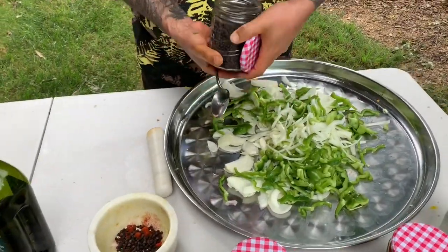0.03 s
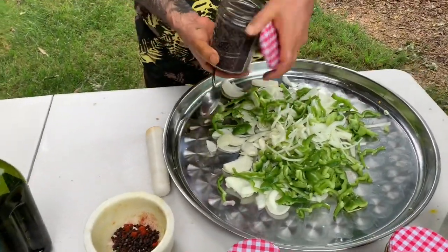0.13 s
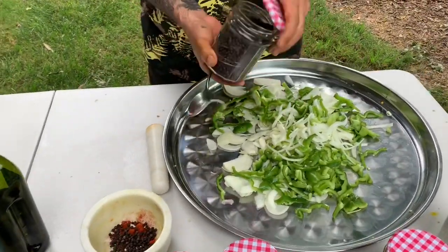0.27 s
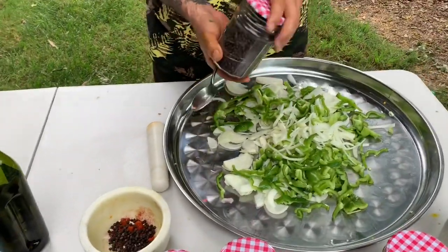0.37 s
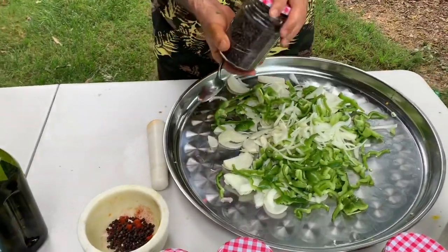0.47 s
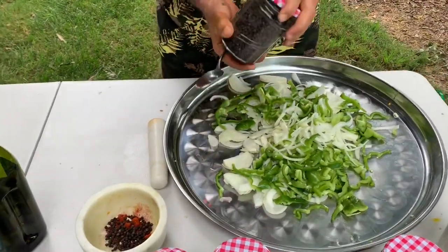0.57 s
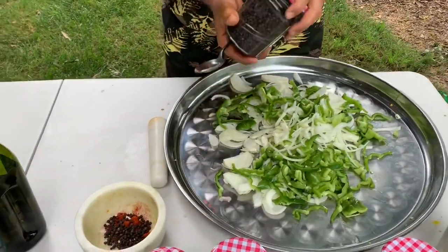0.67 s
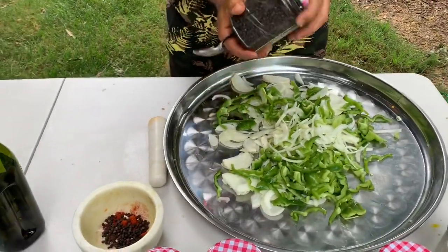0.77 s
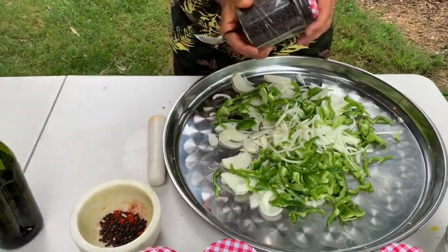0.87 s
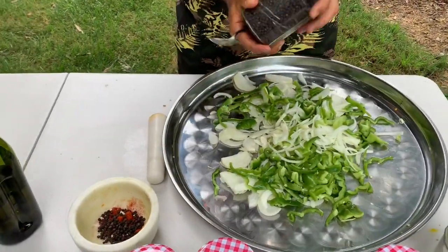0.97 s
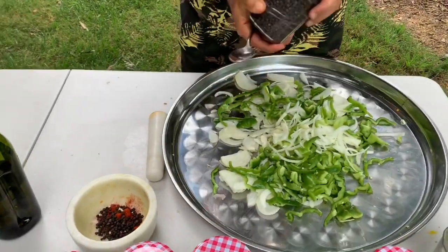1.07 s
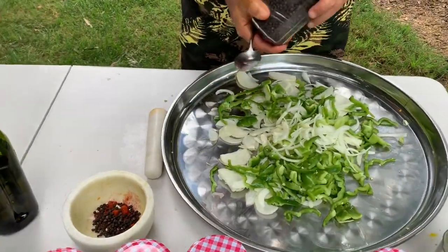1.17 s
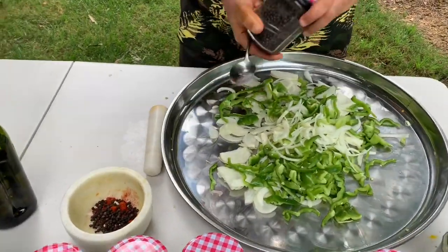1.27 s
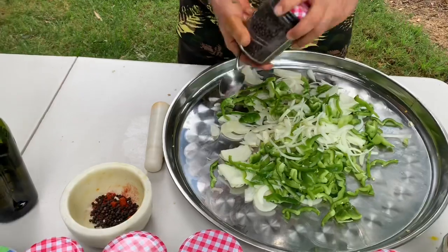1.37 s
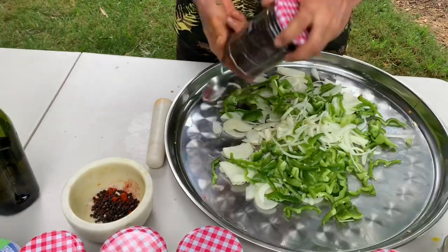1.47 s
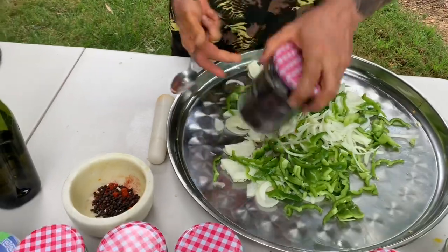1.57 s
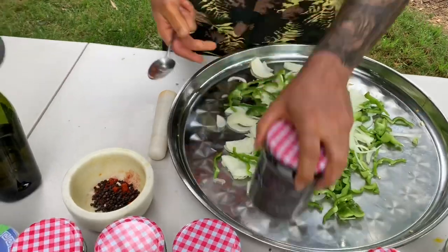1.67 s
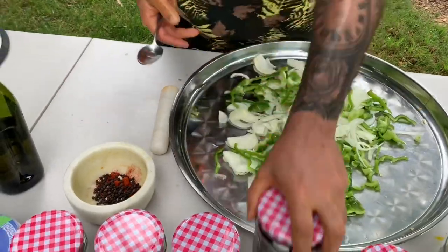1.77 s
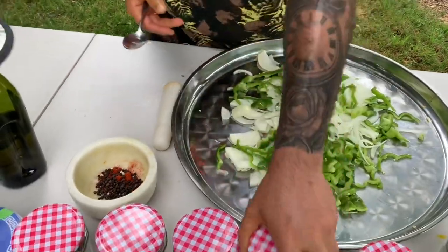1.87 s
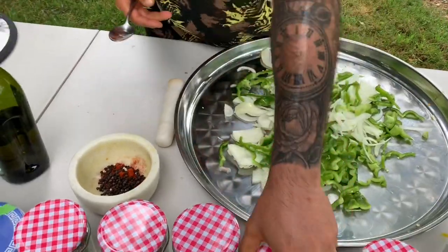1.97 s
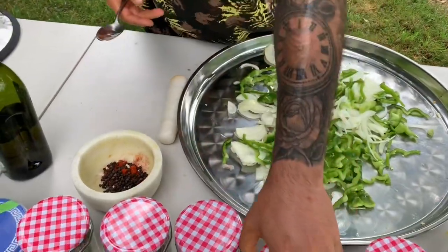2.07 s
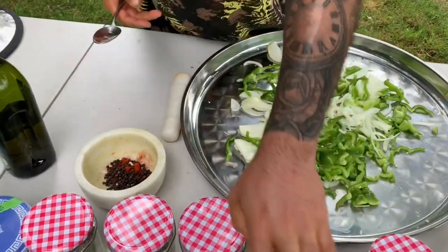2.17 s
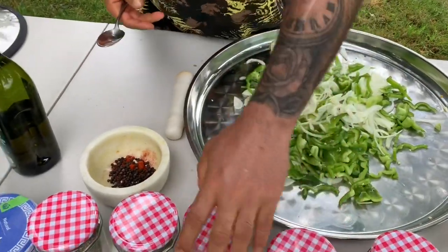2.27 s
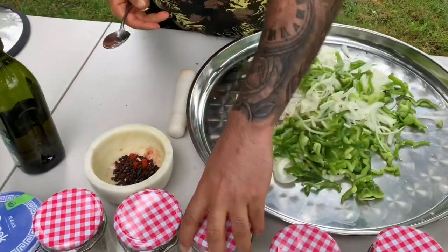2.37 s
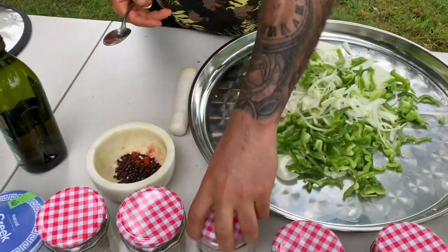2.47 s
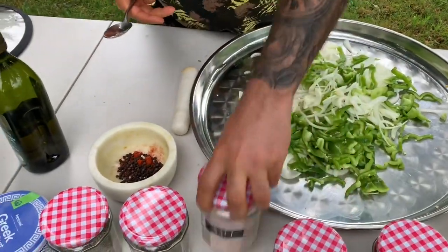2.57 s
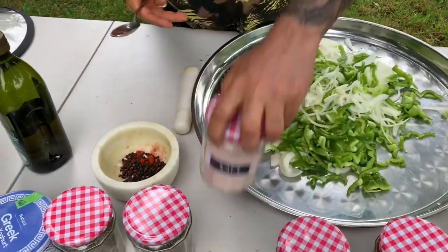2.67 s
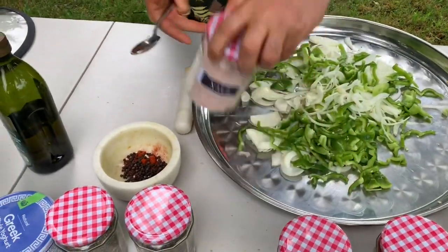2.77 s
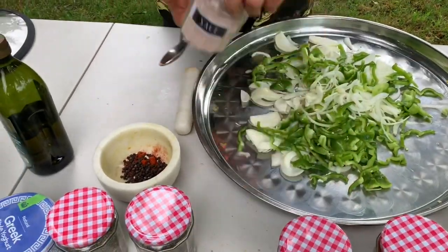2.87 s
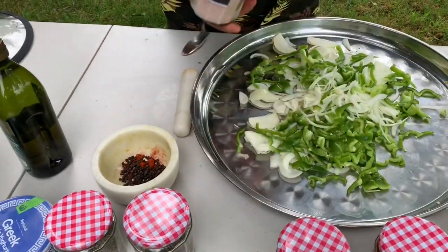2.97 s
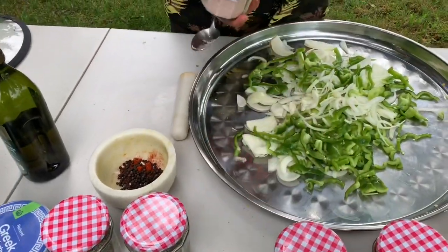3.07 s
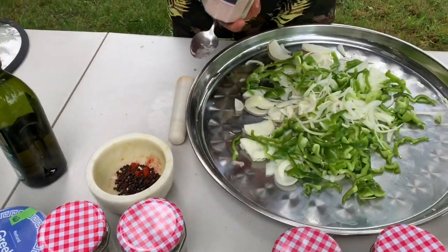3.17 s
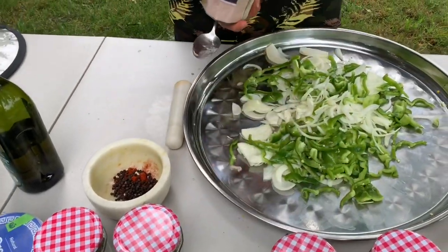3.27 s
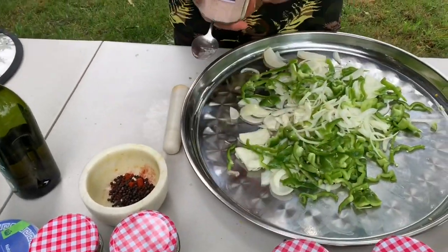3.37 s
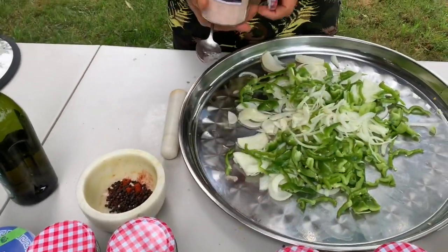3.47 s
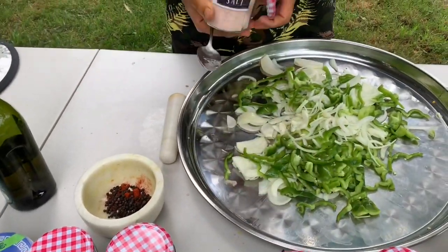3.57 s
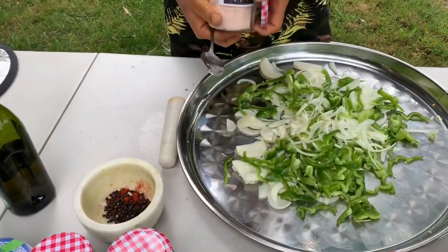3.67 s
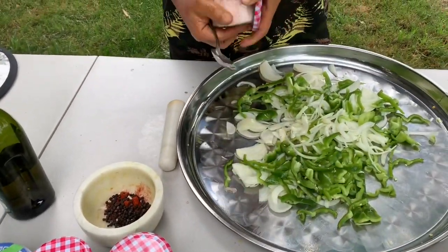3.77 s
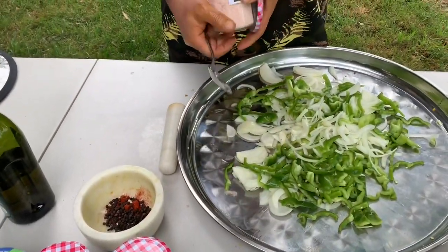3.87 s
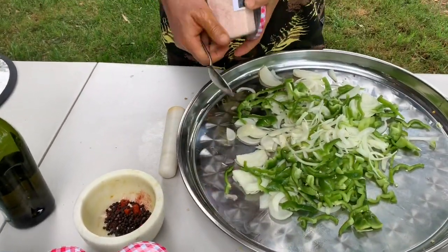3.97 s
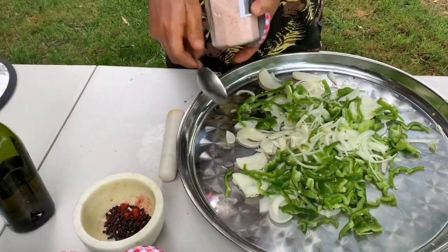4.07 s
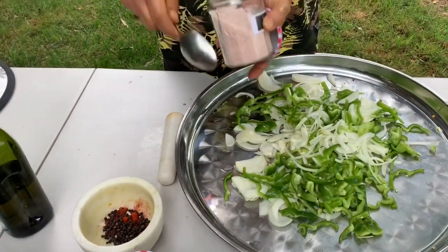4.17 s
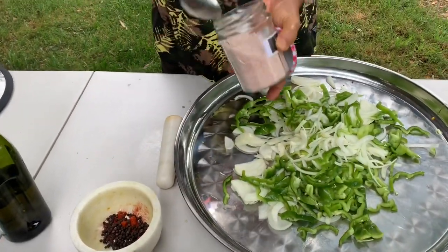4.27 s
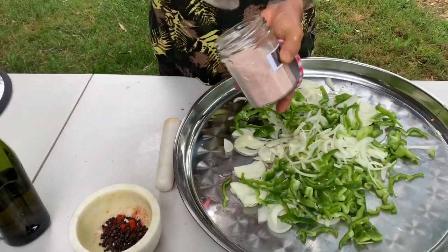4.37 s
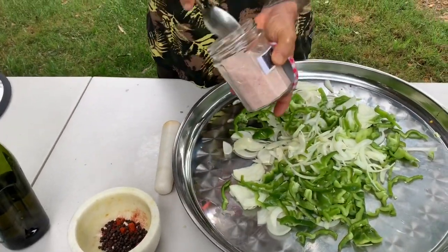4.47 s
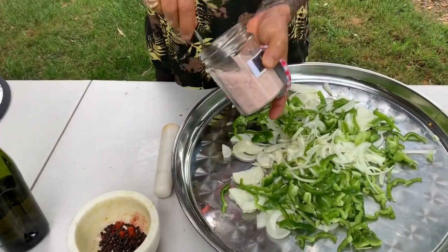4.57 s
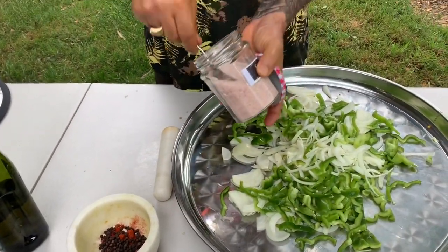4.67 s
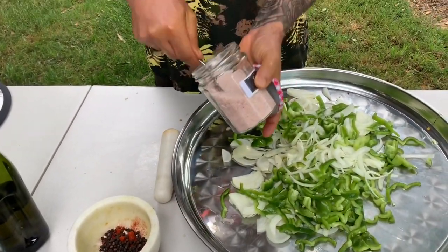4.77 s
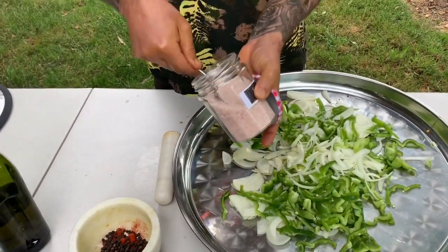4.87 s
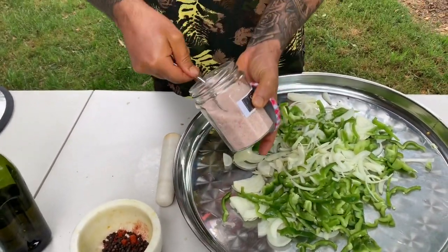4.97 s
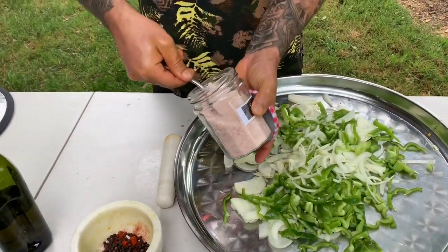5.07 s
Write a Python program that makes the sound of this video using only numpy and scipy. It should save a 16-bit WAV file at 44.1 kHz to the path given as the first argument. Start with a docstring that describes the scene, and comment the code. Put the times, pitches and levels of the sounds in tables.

```python
"""In a garden, spices are added to a steel tray of vegetables on a folding table, near the microphones.
A spoon and a tin lid clink on a pepper jar; the jar is set down hard, so that table, tray and
peppercorns rattle. The spoon clicks on a salt jar's lid, clatters on the tray's rim and taps the glass.
Each impact excites the damped modes of the body struck; friction drives such modes with noise.
A small bird calls over a distant hum."""
import sys
import numpy as np
from scipy import signal
from scipy.fft import rfft, irfft, next_fast_len
from scipy.io import wavfile
from scipy.ndimage import uniform_filter1d, map_coordinates

SR = 44100
rng = np.random.default_rng(int(sys.argv[2]) if len(sys.argv) > 2 else 0)


def dump(signal):
    """Clip the signal to [-1, 1] and save it as 16-bit WAV at the path in sys.argv[1]."""
    limited = np.clip(np.atleast_2d(signal).T, -1, 1)
    pcm = np.round(limited * 32767).astype(np.int16)
    wavfile.write(sys.argv[1], SR, pcm)


N = 225218
TIME = np.arange(N) / SR
AGE = TIME[:SR // 2]  # time since an impact, in s
TOP_HZ = 16400


def amp(db):
    """Amplitude ratio of a level in decibels."""
    return 10 ** (np.asarray(db) / 20)

def unit(x):
    """Normalisation to rms 1."""
    return x / np.sqrt(np.mean(x ** 2) + 1e-20)

def crest(x, size=176):
    """Normalisation of the loudest few milliseconds to rms 1."""
    power = np.abs(uniform_filter1d(x ** 2, size, mode="constant")).mean(0)
    return x / np.sqrt(power.max() + 1e-20)

def along(points, hz):
    """Interpolation of (f/Hz, value) points on a logarithmic frequency axis."""
    f, v = np.transpose(points)
    return np.interp(np.log(hz + 1), np.log(f + 1), v)

def wobble(rate):
    """Smooth random modulation with rate knots a second."""
    return map_coordinates(rng.standard_normal(int(N * rate / SR) + 4), [TIME * rate])

def filtered(x, response):
    """Linear filtering: the spectrum times a frequency response."""
    n = x.shape[-1]
    m = next_fast_len(n + 4096)
    return irfft(rfft(x, m) * response(np.fft.rfftfreq(m, 1 / SR)), m)[..., :n]

def coloured(x, spectrum):
    """Spectral shaping by (f/Hz, level/dB) points, at rms 1."""
    return unit(filtered(x, lambda hz: amp(along(spectrum, hz))))

def pair(n, width):
    """Partly coherent noise at two microphones."""
    mid, side = rng.standard_normal((2, n))
    return np.array([mid + width * side, mid - width * side])

def add(track, s, sound):
    """Superposition of a sound on the track at time s."""
    part = track[:, round(s * SR):][:, :sound.shape[-1]]
    part += sound[..., :part.shape[-1]]

def strokes(rows, attack_s, fade_db_per_s):
    """Envelopes summed in power: each (t/s, duration/s, level/dB) swells up to t, holds, then fades."""
    power = np.zeros(N)
    for s, length, db in rows:
        swell = np.exp(np.minimum(TIME - s, 0) / attack_s)
        power += (swell * amp(db - fade_db_per_s * np.maximum(TIME - s - length, 0))) ** 2
    return np.sqrt(power)

def ring(modes, detune=0, line_width=.0021):
    """Free vibration as a sum of damped modes, varying with the spot struck and the grip."""
    hz, db, t60 = np.transpose(modes)
    strength, pitch, side = rng.standard_normal((3, len(hz)))
    # the shifting grip walks each phase, broadening the line by a fraction line_width of its frequency
    step = np.sqrt(2 * np.pi * line_width * hz / SR)[:, None]
    drift = np.cumsum(rng.standard_normal((len(hz), len(AGE))), axis=1) * step
    phase = 2 * np.pi * np.outer(hz * (1 + detune * pitch), AGE) + drift
    gains = (-1) ** np.arange(len(hz)) * amp(db + strength + np.outer([.5, -.5], side))
    return gains @ (np.sin(phase) * amp(-60 * AGE / t60[:, None]))

def rubbed(modes):
    """Forced vibration: friction noise drives a body's modes, at rms 1."""
    slips = pair(N, 0.18) * amp(2.5 * wobble(200))
    return unit(signal.fftconvolve(slips, ring(modes), axes=1)[:, :N])

def knocks(rows, attack_s=0.0038):
    """A single damped resonance gives one short, dull note for each row."""
    out = np.zeros((2, N))
    for s, db, hz, t60 in rows:
        note = np.sin(2 * np.pi * hz * AGE) * amp(-60 * AGE / t60) * (1 - np.exp(-AGE / attack_s))
        add(out, s, amp(db) * note / np.abs(note).max())
    return out


# spectrum of the open air: f/Hz, level/dB
AIR_SPECTRUM = [(20, -45), (45, -14), (65, -6.5), (165, -20), (237, -17.5), (361, -25.5), (428, -17.5),
                (599, -27), (816, -28), (1900, -38), (2660, -42.5), (3140, -47), (13200, -49),
                (16500, -69.5)]
# its likeness at the two microphones: f/Hz, coherence
AIR_COHERENCE = [(60, 0.81), (240, 0.93), (950, 0.15), (3770, 0.034), (15000, 0.01)]
# tones of distant machinery: f/Hz, level/dB
HUM_TONES = [(61, -60.5), (441, -86)]

def garden():
    """A diffuse field, coherent only in the bass: open-air rumble, with a wavering far hum."""
    def mid_side_gains(hz):
        angle = np.arccos(np.clip(along(AIR_COHERENCE, hz), -1, 1)) / 2
        return np.array([np.cos(angle), np.sin(angle)])
    mid, side = filtered(rng.standard_normal((2, N)), mid_side_gains)
    air = amp(-60.5 + 0.52 * wobble(7.9)) * coloured(np.array([mid + side, mid - side]), AIR_SPECTRUM)
    hum = sum(amp(db + wobble(2.6)) * np.sin(2 * np.pi * hz * TIME + 0.8 * wobble(2.5))
              for hz, db in HUM_TONES)
    return air + hum


# a faint far whine: t/s, duration/s, level/dB, f/Hz
WHINES = [(2.536, .8, -71.5, 813)]

def far_whine():
    """Phase modulation makes a thin, distant tone waver as it comes and goes."""
    return sum(strokes([row], 0.048, 110) * np.sin(2 * np.pi * hz * TIME + .5 * wobble(15))
               for *row, hz in WHINES)


# a bird's thin, buzzy notes: t/s, duration/s, level/dB
BIRD_NOTES = [(2.099, 0.085, -58), (2.194, 0.077, -57), (2.745, 0.093, -58), (2.845, 0.06, -54.5),
              (3.02, 0.038, -55), (3.1, 0.025, -53), (3.165, 0.12, -59)]

def bird(pitch_hz=7550, shake_hz=400, shake_rate=900, fall_hz=400):
    """Rapid frequency modulation roughens falling notes; scattering by foliage blurs them."""
    song = np.zeros((1, N))
    for s, length, db in BIRD_NOTES:
        t = AGE[:int(length * SR)]
        shake = map_coordinates(rng.standard_normal(len(t)), [t * shake_rate])
        hz = pitch_hz + fall_hz * (.5 - t / length) + shake_hz * shake
        add(song, s, amp(db) * np.sin(np.pi * t / length) ** 2 * np.sin(2 * np.pi * np.cumsum(hz) / SR))
    leaves = rng.standard_normal((2, len(AGE))) * amp(-60 * AGE / 0.2)
    return signal.fftconvolve(song, leaves / np.linalg.norm(leaves[0]), axes=1)[:, :N]


# reverberation time of the garden: f/Hz, T60/s
GARDEN_DECAY = [(100, 0.24), (1000, 0.93), (2500, 0.54), (8000, 0.24), (15000, 0.28)]

def reflections(x, echo_s=0.16, smear_s=0.044, echo_db=3):
    """Reverberation: trees and fences return a decaying tail with one smeared echo."""
    hz, t, noise = signal.stft(rng.standard_normal((2, SR)), SR, nperseg=256)
    fence_db = echo_db * np.exp(-.5 * ((t - echo_s) / smear_s) ** 2)
    decay_db = 60 * t / along(GARDEN_DECAY, hz)[:, None]
    tail = signal.istft(noise * amp(fence_db - decay_db), SR, nperseg=256)[1]
    return signal.fftconvolve(x, tail / np.linalg.norm(tail[0]), axes=1)[:, :N]


def hops(landing_s=1.952, flight_s=.063, restitution=0.78, first_db=-34, loss_db=9.5, scatter=0.24):
    """Inelastic bouncing: peppercorns thrown up by the jar's landing hop ever shorter and weaker."""
    hop = np.arange(3)
    flights = flight_s * restitution ** hop
    return list(zip(landing_s + np.cumsum(flights), first_db - loss_db * hop, scatter * flights))

# spice slides in a tilted jar: t/s, duration/s, level/dB
SLIDES = [(0.46, 0.014, -57.5), (0.79, 0.32, -63), (1.7, 0.18, -64), (4.52, .15, -68)]
# a few peppercorns tumble against the glass: t/s, level/dB, spread/s
CORN_TUMBLES = [(1.1, -53, 0.0015), (0.89, -54, 0.00095), (0.98, -43.5, 0.00085), (1.1, -45, 0.00073),
                (1.108, -60, 0.0015), (1.534, -58, 0.0017), (1.711, -59.5, 0.0016), (1.566, -61, 0.01324)]
# spectrum of grains on glass: f/Hz, level/dB
GRAIN_SPECTRUM = [(600, -25), (1200, -5), (2600, -0.5), (5500, -4), (8300, -0.5), (10500, -1.5),
                  (11800, -15), (13300, -2.5), (14700, -11.5), (16500, -21.5)]

def spice(grains_per_s=8000, grain_t60=.003, scatter_db=2, spurt_db=1.6):
    """Shot noise: countless dry grains strike glass, each at its own pitch, as they slide and hop."""
    flow = strokes(SLIDES, attack_s=.02, fade_db_per_s=170.5) * amp(spurt_db * wobble(70))
    for s, db, spread in CORN_TUMBLES + hops():
        flow += amp(db) * np.exp(-.5 * ((TIME - s) / spread) ** 2)
    when, pitch, strength, side = rng.random((grains_per_s * N // SR, 4)).T[..., None]
    t = AGE[:128]
    fading = amp(-scatter_db * np.log(1 - strength) - 60 * t / grain_t60)
    phase = 2 * np.pi * TOP_HZ * pitch * t
    index = ((when * N).astype(int) + np.arange(len(t))).ravel()
    grains = [np.bincount(index, (fading * np.sin(phase + ear * (side - .5))).ravel(), N)[:N]
              for ear in (1, -1)]
    return flow * coloured(np.array(grains), GRAIN_SPECTRUM)


def favoured(modes, spot_hz=None, boost_db=13, octaves=0.13):
    """The point of excitation weights the modes: those near spot_hz ring more strongly."""
    if spot_hz is None:
        return modes
    return [(hz, db + boost_db * np.exp(-.5 * (np.log2(hz / spot_hz) / octaves) ** 2), t60)
            for hz, db, t60 in modes]

# spectrum of the crowd of short-lived modes in every contact: f/Hz, level/dB
CRACK_SPECTRUM = [(150, -25), (400, 2), (900, -4), (2400, 0.5), (4200, -10), (6500, -14.5), (10300, -10),
                  (11800, -17.5), (13500, -10), (16500, -25)]

def clinks(taps, modes, crack_db, crack_t60, lowest_hz, detune):
    """Impact excitation: modes ring over a brief crack; a tap's treble is set relative to its body."""
    out = np.zeros((2, N))
    lowpass, highpass = (signal.butter(4, 5000, kind, fs=SR, output="sos") for kind in ("low", "high"))
    for s, db, treble_db, *spot_hz in taps:
        crowd = coloured(pair(len(AGE), 0.66), CRACK_SPECTRUM)
        crowd = filtered(crowd, lambda hz: hz ** 2 / (hz ** 2 + lowest_hz ** 2))
        crack = crowd * (amp(-60 * AGE / crack_t60) + amp(-22 - 60 * AGE / 0.11))
        blow = crest(ring(favoured(modes, *spot_hz), detune)) + amp(crack_db) * crest(crack)
        # the body takes a moment to swell; the treble is strongest at the first touch
        body = signal.sosfilt(lowpass, blow) * (1 - np.exp(-AGE / 0.0026))
        treble = signal.sosfilt(highpass, blow) * (1 - np.exp(-AGE / 0.00051))
        treble *= 1 + 0.29 * np.exp(-AGE / 0.0057)
        add(out, s, amp(db) * (crest(body) + amp(treble_db) * crest(treble)))
        # a faint, brief hiss swells into each clink and softens its onset
        hiss = crowd[:, :662] * amp(-2000 * AGE[:662][::-1])
        add(out, s - 662 / SR, amp(db - 12) * hiss)
    return out


# modes of the spoon's click on the salt jar's lid: f/Hz, level/dB, T60/s
CLICK_MODES = [(1621, 2.5, 0.021), (1943, -6.5, 0.028), (3036, -17, 0.052), (3400, -8, 0.034),
               (4494, -2, 0.0088), (6930, -9.5, 0.11), (7700, -0.5, 0.025), (8555, 0.5, 0.05),
               (8750, 9, 0.02), (11490, 0, 0.026)]
# the click: t/s, level/dB, treble/dB
CLICKS = [(2.904, -28, 12)]

def spoon_click():
    """Impact excites high modes: the spoon meets the salt jar's lid with one bright, ringing click."""
    return clinks(CLICKS, CLICK_MODES, crack_db=-4.5, crack_t60=0.0071, lowest_hz=247, detune=0.0014)


# modes of the tray's rim and floor: f/Hz, level/dB, T60/s
RIM_MODES = [(1007, -1, 0.012), (1134, -12, 0.104), (1684, -4.5, 0.033), (2106, -3, 0.12), (2340, 4, 0.037),
             (2800, -6, 0.054), (3000, -9, 0.14), (5830, -17, 0.045), (9700, -28, .025), (13200, -5, 0.006)]
FLOOR_MODES = [(353, -4, 0.015), (784, -21.5, 0.136), (978, -19.5, 0.12), (1241, -20, 0.143),
               (1815, -16, 0.061), (2360, -3, 0.081), (2533, 0, 0.036), (2956, -1.5, 0.031),
               (3520, -7, 0.025), (4020, -9.5, 0.033), (5200, -31, .04), (8840, -11, 0.048),
               (13400, -35, 0.028)]
# the spoon knocks on the rim and touches the floor: t/s, level/dB, treble/dB
RIM_HITS = [(3.534, -29, -9.5), (3.586, -37.5, -12), (3.592, -39, -22), (3.620, -31.5, -3),
            (3.640, -45, 3.5), (3.665, -45.5, -12)]
FLOOR_HITS = [(3.241, -43.5, -10.5), (3.248, -42, -9), (3.707, -26.5, 0), (3.714, -24.5, -7.5)]

def spoon_on_tray():
    """Bending modes of a struck plate: the steel tray's rim and floor each ring with their own set."""
    rim = clinks(RIM_HITS, RIM_MODES, crack_db=3, crack_t60=0.0086, lowest_hz=1200, detune=0.0079)
    floor = clinks(FLOOR_HITS, FLOOR_MODES, crack_db=-9.5, crack_t60=0.083, lowest_hz=730, detune=0.0019)
    return rim + floor


# a faint metallic ring dies away at the start; later the spoon drags along the tray:
# t/s, duration/s, level/dB
TRAY_RINGS = [(0.01, 0.021, -58), (3.57, 0.1504, -51.5)]

def tray_ringing():
    """Forced vibration: noise drives the modes of the tray's floor and rim together."""
    envelope = strokes(TRAY_RINGS, attack_s=0.028, fade_db_per_s=278.5)
    return envelope * unit(rubbed(FLOOR_MODES) + rubbed(RIM_MODES))


# modes of the spoon and the salt jar: f/Hz, level/dB, T60/s
SPOON_MODES = [(2390, 2, 0.024), (7050, -6.5, 0.096), (8450, 6.5, 0.025), (12350, -10, 0.2),
               (13400, -1.5, 0.037), (15600, -3, 0.081)]
SALT_MODES = [(2286, 3, 0.016), (2568, 2.5, 0.03), (2900, -0.5, 0.016), (4290, -12, 0.027),
              (7760, -2, 0.031)]
# the spoon grazes the jar's mouth, then hits the glass inside: t/s, level/dB, treble/dB
GRAZES = [(4.442, -31, 0), (4.450, -33.5, 4), (4.464, -35.5, 5)]
SALT_HITS = [(4.506, -22, -4)]

def spoon_in_salt_jar():
    """Impact excites either body: grazing rings the spoon, a direct hit rings the glass."""
    spoon = clinks(GRAZES, SPOON_MODES, crack_db=-2.5, crack_t60=0.011, lowest_hz=610, detune=0.002)
    glass = clinks(SALT_HITS, SALT_MODES, crack_db=-9.5, crack_t60=0.014, lowest_hz=900, detune=0.0037)
    return spoon + glass


# modes of the hand-held jar: f/Hz, level/dB, T60/s
JAR_MODES = [(876, -3.5, 0.038), (1107, -6, 0.054), (1450, -2.5, 0.036), (2057, -3.5, 0.033),
             (2300, -3.5, 0.036), (2850, -7.5, 0.04), (3710, -11.5, 0.041), (4560, -9.5, 0.013),
             (6800, -17, 0.035), (10100, -19, 0.03), (12300, -14, .025)]
# spoon and lid strike it: t/s, relative level/dB, treble/dB, favoured f/Hz
JAR_HITS = [(0.333, -24.5, -18.5, 1550), (0.351, -17, -4, 4500), (0.379, -32.5, -1.5, 1100),
            (0.449, -27.5, 5, 4250), (0.461, -26.5, -4, 970), (0.491, -31, -9, 1760),
            (0.539, -35, -11, 1720), (0.555, -43.5, -8, 1398), (0.716, -30, -8.5, 2200),
            (0.738, -28.5, -6.5, 2100), (0.755, -21.5, -3, 1999), (0.762, -12, -6.5, 2030),
            (0.793, -30, -12, 1420), (0.855, -38, -6.5, 1370), (0.95, -35, -7, 1840),
            (1.014, -37.5, -2, 2100), (3.024, -42, -8, 1350), (3.069, -26, -14.5, 960),
            (3.091, -37.5, -5, 1074), (3.192, -41.5, -9.5, 1670)]

def jar_clinks():
    """Damped modes of hand-held glass, weighted anew by each spot that spoon or lid strikes."""
    glass = clinks(JAR_HITS, JAR_MODES, crack_db=-0.5, crack_t60=0.024, lowest_hz=448, detune=0.014)
    return amp(-8.5) * glass


# modes of the air in the open jar: f/Hz, level/dB, T60/s
CAVITY_MODES = [(237.7, -1.2, 0.02), (318, -1.3, 0.016)]
# its hollow answer to a bump: t/s, level/dB, f/Hz, T60/s
CAVITY_KNOCKS = [(0.353, -32.5, 280, 0.081), (0.456, -28.5, 275, 0.077), (0.72, -35.5, 258, 0.13),
                 (0.7635, -21, 292, 0.037), (3.071, -34.5, 305, 0.093)]
# spoon and lid rub on the glass: t/s, duration/s, level/dB
GLASS_RUBS = [(0.47, 0.078, -50.5), (0.75, 0.035, -44.5), (0.9, 0.091, -49.5), (3.165, 0.027, -50.5)]

def jar_cavity():
    """Cavity resonance: bumps and rubbing stir the jar's hollow note; rubbing also sounds the glass."""
    friction = rubbed(CAVITY_MODES) + amp(-13) * rubbed(JAR_MODES)
    friction += amp(-19.5) * coloured(pair(N, 0.54) * amp(4 * wobble(150)), CRACK_SPECTRUM)
    return knocks(CAVITY_KNOCKS) + strokes(GLASS_RUBS, attack_s=0.039, fade_db_per_s=222) * friction


# modes of a jar struck on its foot: f/Hz, level/dB, T60/s
FOOT_MODES = [(946, -4, 0.023), (1475, -21, 0.054), (2222, -19, 0.056), (2593, -3, 0.027), (2859, -8, 0.05),
              (3120, -2, 0.018), (4264, -3, 0.017), (4738, 8.5, 0.01), (7980, -24.5, .02)]
# the foot meets the table: t/s, level/dB, treble/dB
FOOT_HITS = [(1.951, -17.5, -1.5), (1.958, -22.5, -38.5), (1.988, -32.5, -38.5), (2.061, -42, -17),
             (2.355, -55.5, -17)]

def jar_foot():
    """A hard, brief contact excites the high modes of the glass as the jar is set down."""
    return clinks(FOOT_HITS, FOOT_MODES, crack_db=1, crack_t60=0.0068, lowest_hz=400, detune=0.0024)


# modes of the table top: f/Hz, level/dB, T60/s
TABLE_MODES = [(80, -13, 0.44), (119, -5.5, 0.075), (170, -0.5, 0.055), (255, -10, .17), (296, -16, 0.2),
               (425, -18.5, 0.11), (473.3, 2, 0.053), (539, -19, 0.19), (627, -8.5, 0.1),
               (805, -6.5, 0.071), (995, -17.5, 0.16), (1593, -11.5, 0.067)]
# a jar's weight lands on it: t/s, level/dB, contact time/ms
LANDINGS = [(1.952, -2.5, 0.34), (1.9577, -1, 2.4), (2.371, -26.5, 2.75), (2.411, -38.5, 2.2)]
# the foot skids before landing: t/s, duration/s, level/dB
FOOT_SKIDS = [(1.905, 0.055, -39)]
# a jar rocks and knocks the top: t/s, level/dB, f/Hz, T60/s
JAR_ROCKS = [(1.998, -25, 408, 0.19), (2.117, -36, 536, 0.064), (2.357, -36, 505, 0.046),
             (2.369, -39, 428.6, 0.09), (2.401, -39.5, 412, 0.062)]
# spectrum of things chattering on the table: f/Hz, level/dB
CHATTER_SPECTRUM = [(24, -44.5), (40, -24.5), (87, -5), (150, -9.5), (377, -10.5), (410, -6), (475, -10.5),
                    (650, -17), (909, -24), (1930, -37.5), (2590, -28.5), (3070, -38.5), (6000, -46.5),
                    (7800, -68.5), (13200, -120)]

def table(chatter_db=-22.5, hold_s=0.023, fade_db_per_s=167, flutter_db=1.9):
    """A force pulse drives the table's modes, duller for longer contact; everything on it chatters."""
    boom = np.zeros((2, N))
    for s, db, contact_ms in LANDINGS:
        force = np.exp(-AGE * 1000 / contact_ms)
        add(boom, s, amp(db) * signal.fftconvolve(ring(TABLE_MODES), force[None] / force.sum(), axes=1))
    jolts = [(s, hold_s, chatter_db + 0.99 * db) for s, db, _ in LANDINGS]
    shaking = strokes(jolts, 0.0049, fade_db_per_s) + strokes(FOOT_SKIDS, 0.015, fade_db_per_s)
    chatter = unit(coloured(pair(N, 0.35), CHATTER_SPECTRUM) * amp(flutter_db * wobble(90)))
    return boom + knocks(JAR_ROCKS) + shaking * chatter


def scene(right_db=2.17):
    """Superposition: things handled are close, nearly dry and a little right; the garden lies behind."""
    near = jar_clinks() + spoon_click() + spoon_on_tray() + spoon_in_salt_jar() + tray_ringing()
    near += jar_foot() + jar_cavity() + table() + spice()
    near *= amp([[-right_db / 2], [right_db / 2]])
    return near + amp(-29) * reflections(near) + bird() + far_whine() + garden()


# response common to both microphone ports: f/Hz, level/dB
MIC_RESPONSE = [(10800, 0), (11700, -11), (12500, 2.5), (14200, 1.5), (15000, -7.5), (15700, -3)]
# left minus right: f/Hz, level/dB
MIC_BALANCE = [(120, 0), (1100, -1.5), (2500, 1.6), (8300, -2.5), (11000, 1.5)]
# lead of left over right: f/Hz, phase/rad
MIC_PHASE = [(100, 0), (1200, 0.26), (4400, 1.43), (6400, -0.66), (8400, -2.5), (10700, -0.93),
             (13500, 2.05)]

def record(dry):
    """Transfer function of the microphones: port colour and phase, bass cut, soft peaks, band limit."""
    def ports(hz):
        halves = np.array([[.5], [-.5]])
        gain = amp(along(MIC_RESPONSE, hz) + halves * along(MIC_BALANCE, hz))
        return gain * np.exp(1j * halves * along(MIC_PHASE, hz))
    thin = signal.sosfilt(signal.butter(4, 44, "high", fs=SR, output="sos"), filtered(dry, ports))
    rounded = thin / (1 + np.abs(thin / .95) ** 6) ** (1 / 6)
    return filtered(rounded, lambda hz: 1 / np.sqrt(1 + (hz / TOP_HZ) ** 200))


dry = scene()
out = record(dry)
dump(out)
```